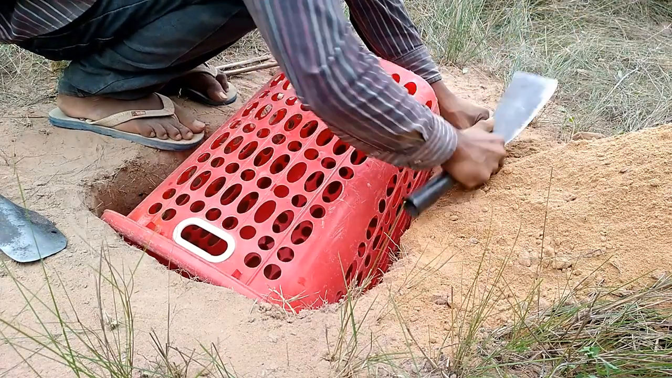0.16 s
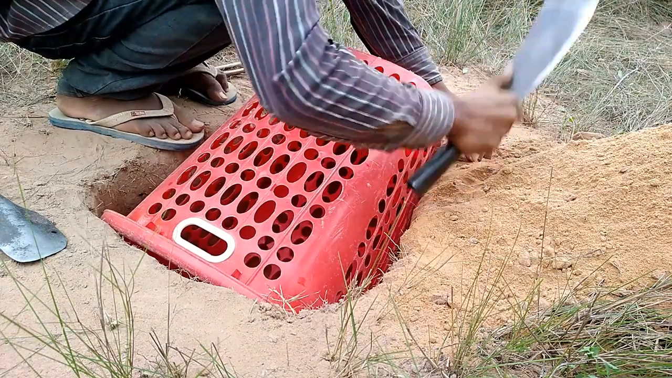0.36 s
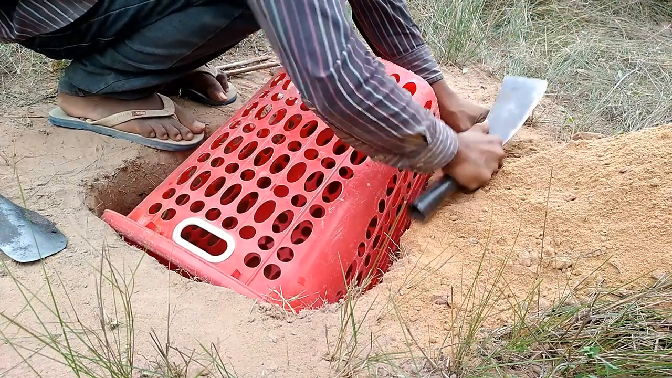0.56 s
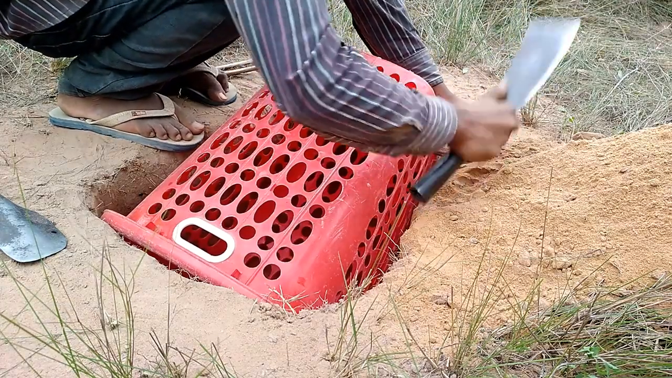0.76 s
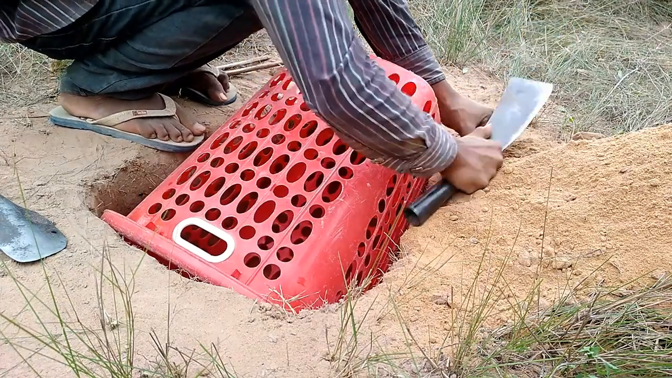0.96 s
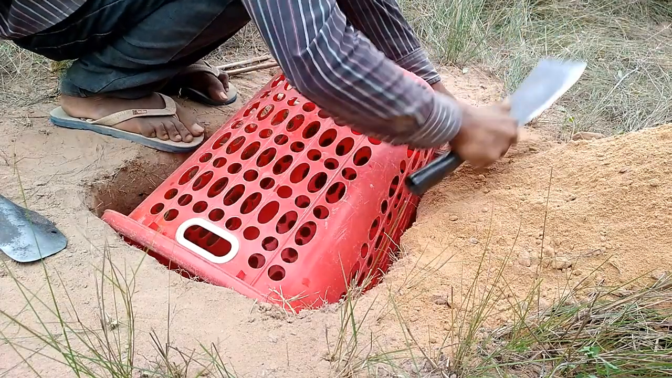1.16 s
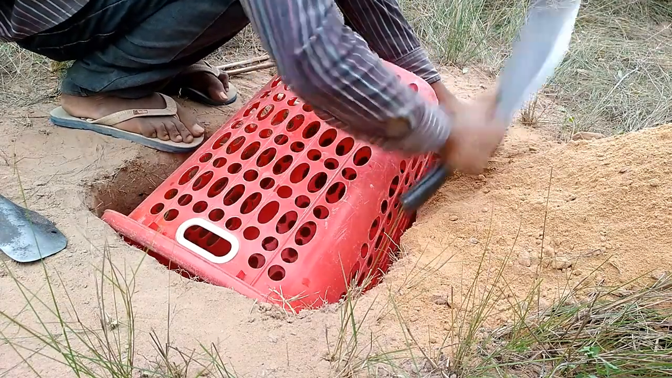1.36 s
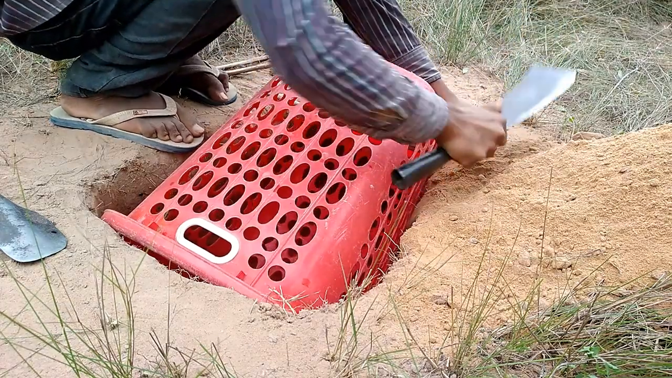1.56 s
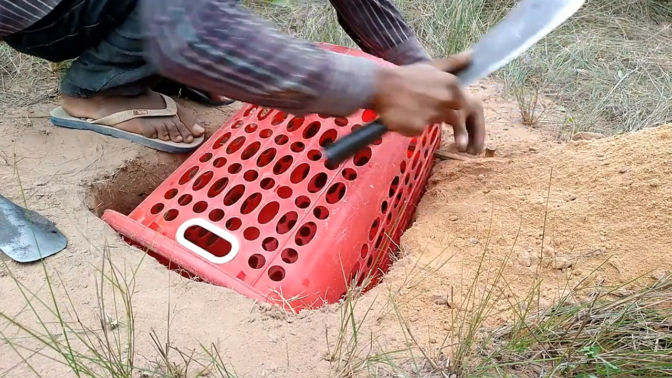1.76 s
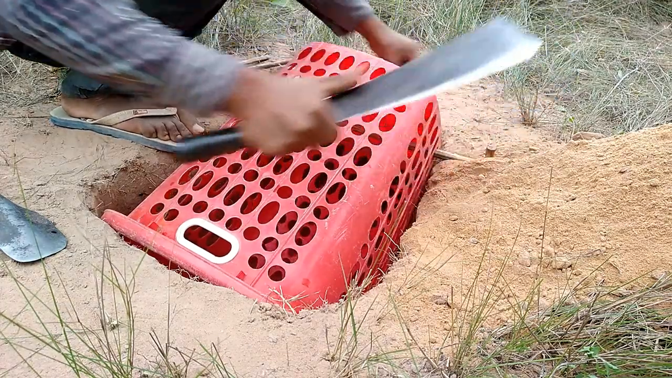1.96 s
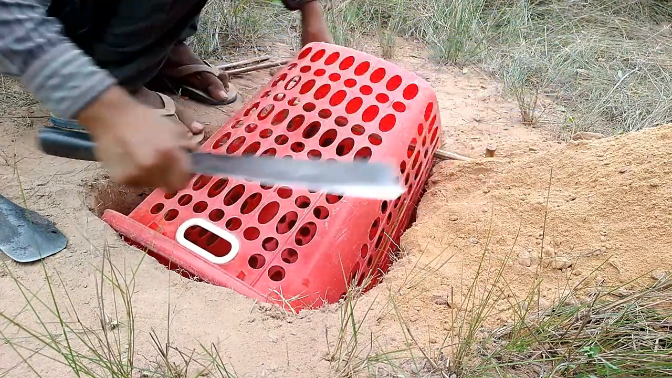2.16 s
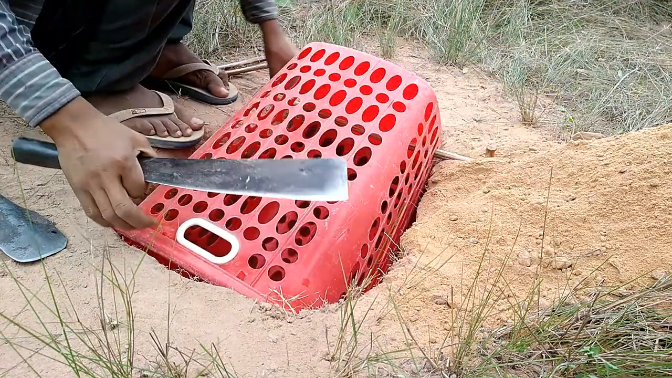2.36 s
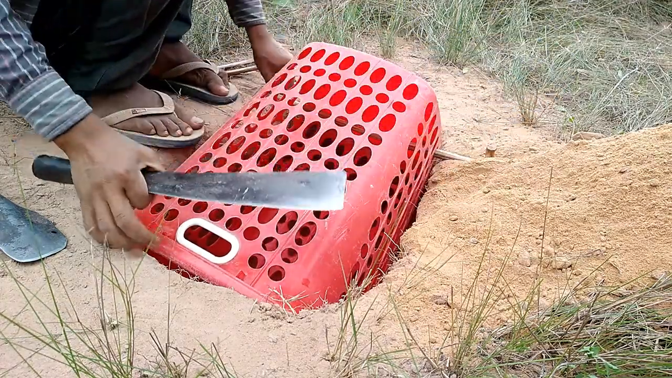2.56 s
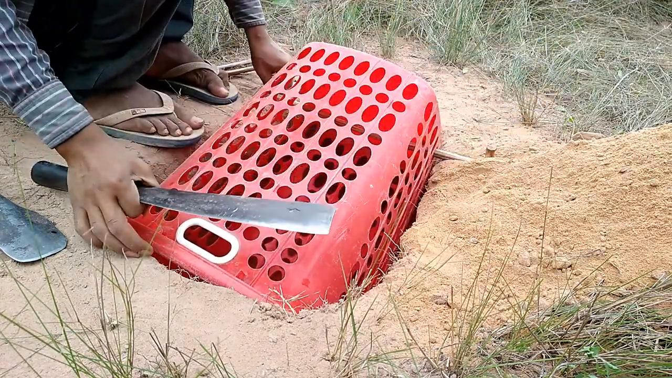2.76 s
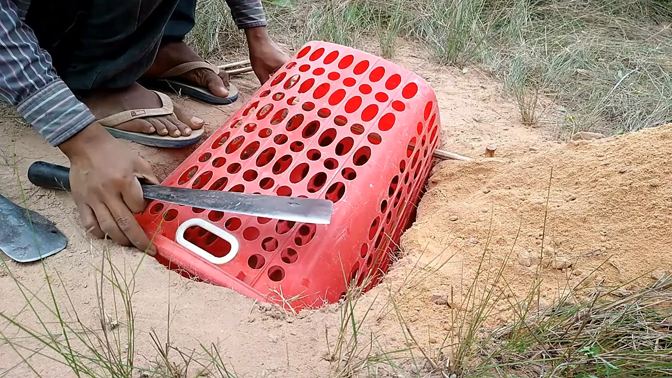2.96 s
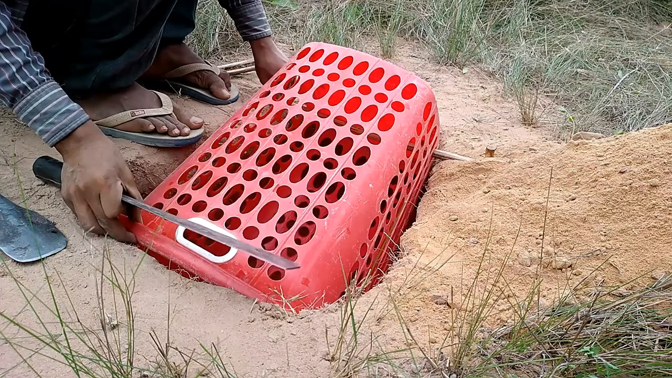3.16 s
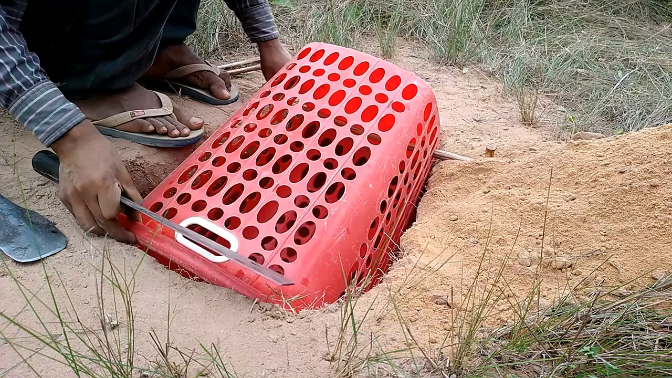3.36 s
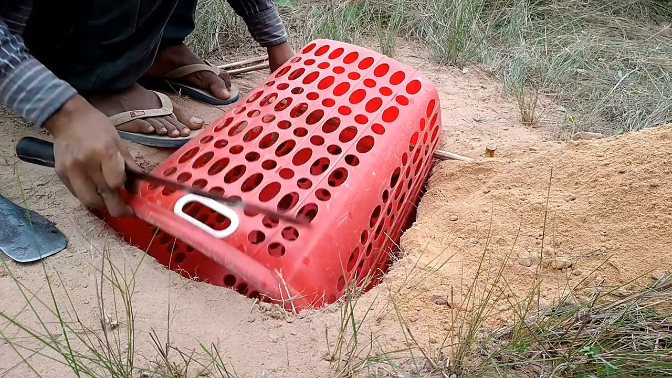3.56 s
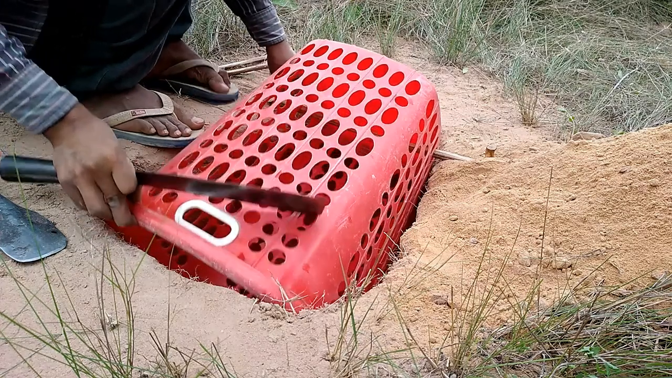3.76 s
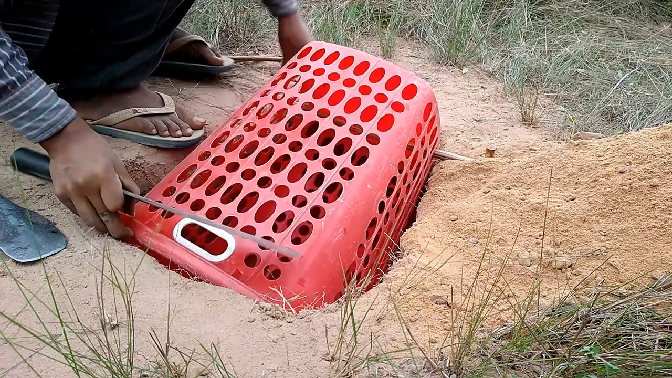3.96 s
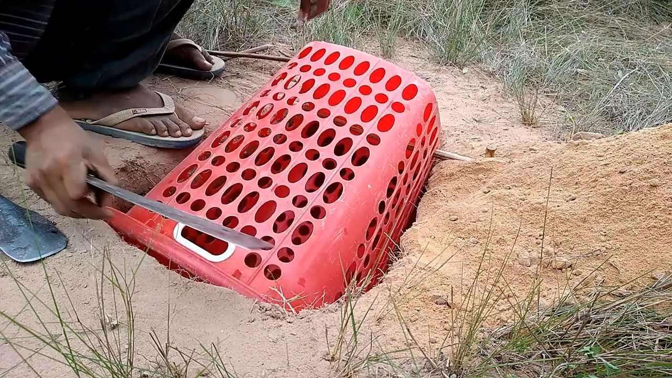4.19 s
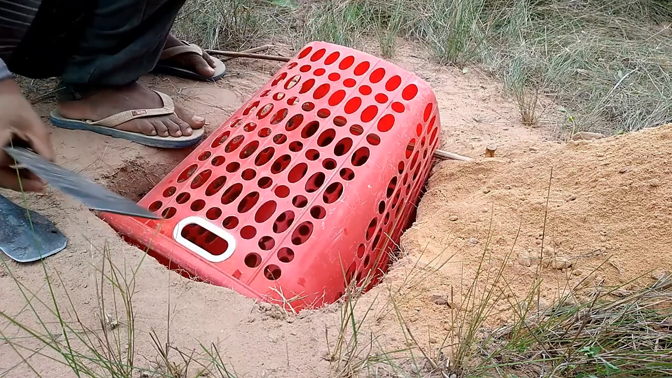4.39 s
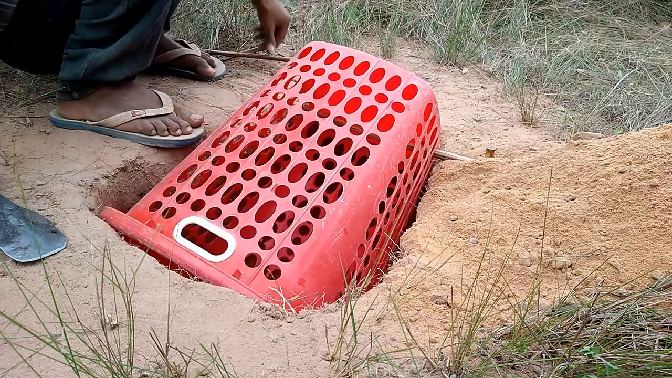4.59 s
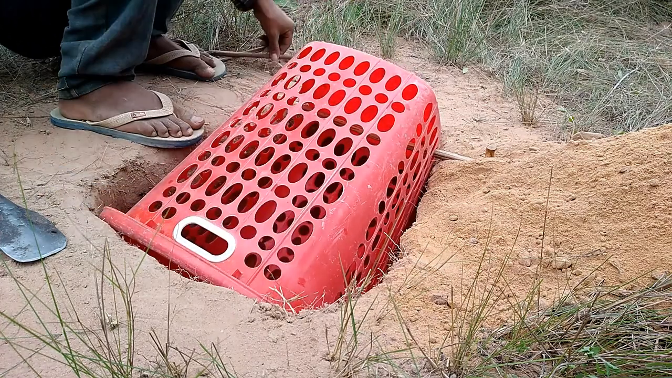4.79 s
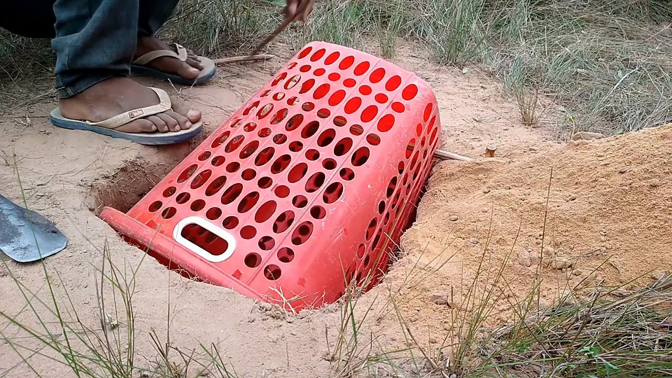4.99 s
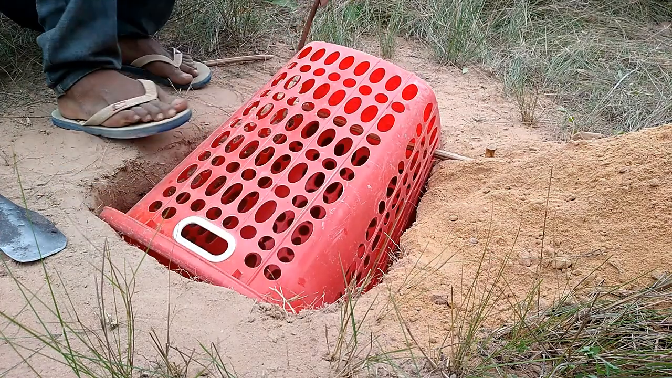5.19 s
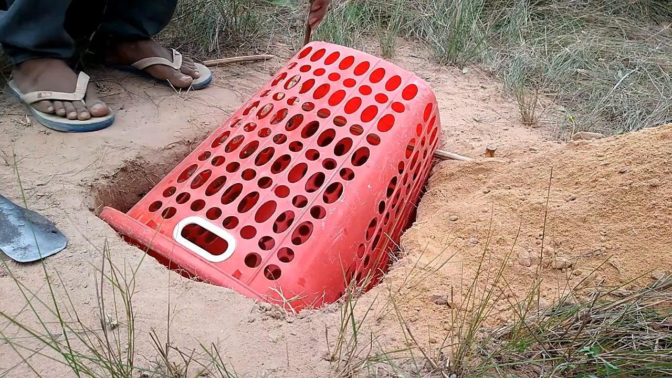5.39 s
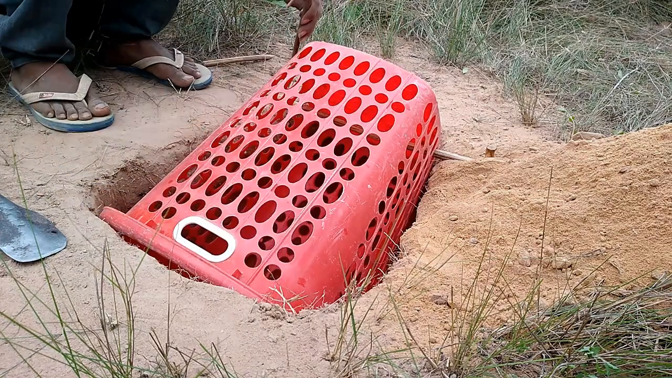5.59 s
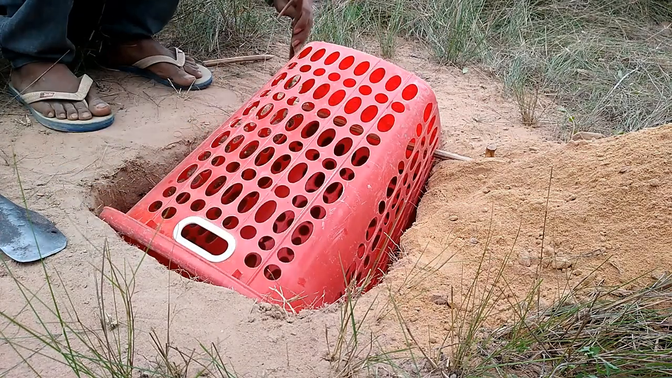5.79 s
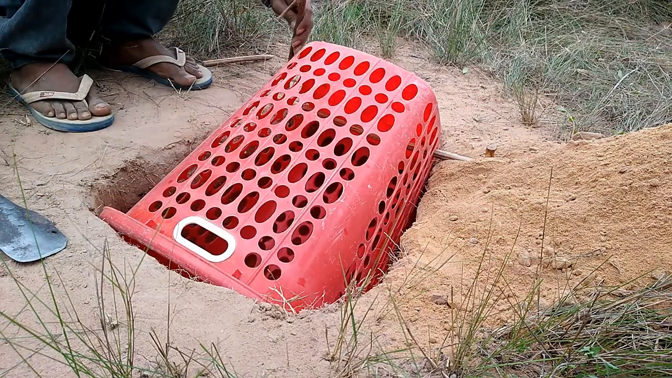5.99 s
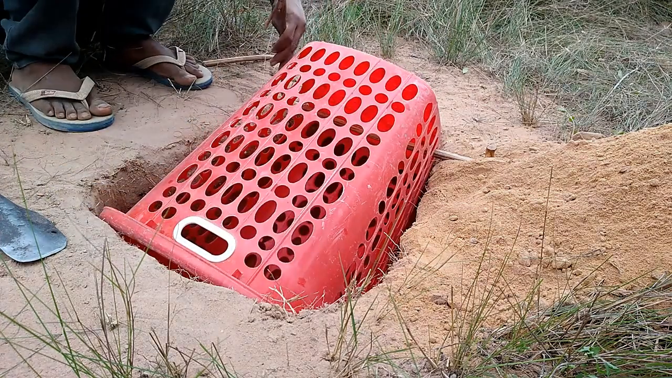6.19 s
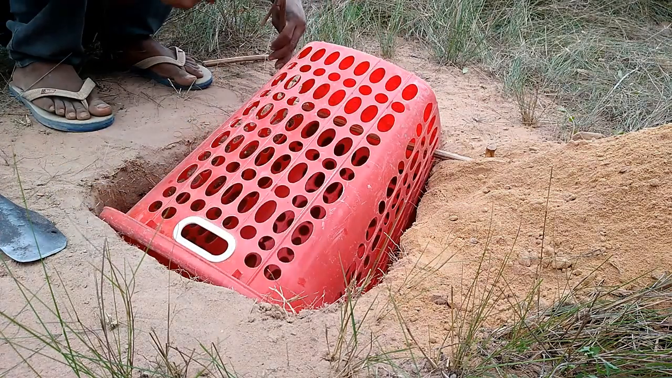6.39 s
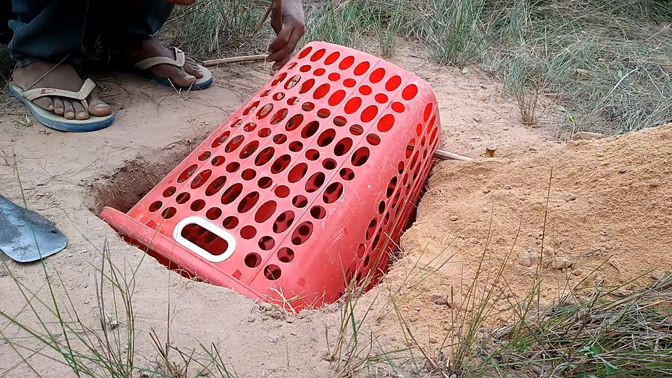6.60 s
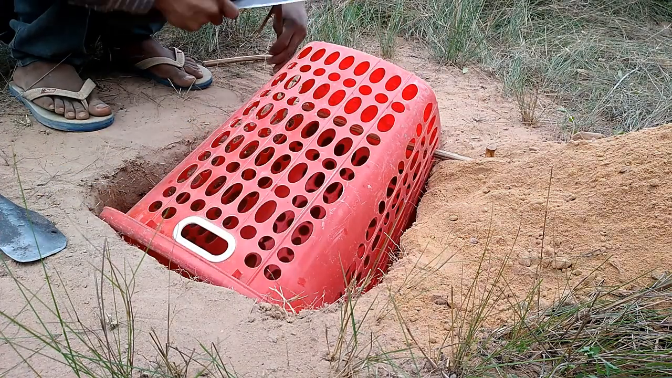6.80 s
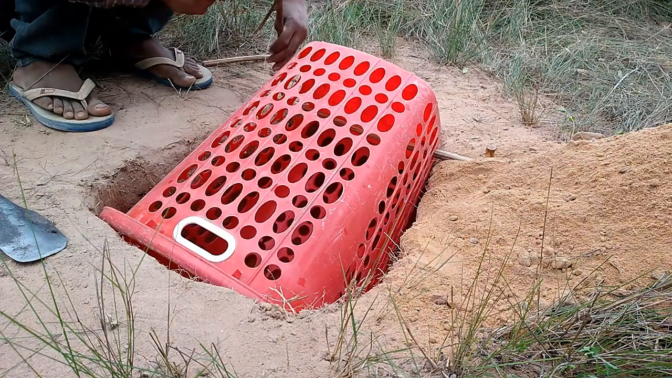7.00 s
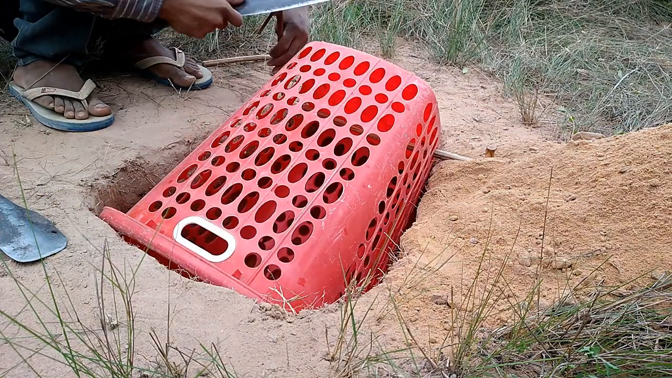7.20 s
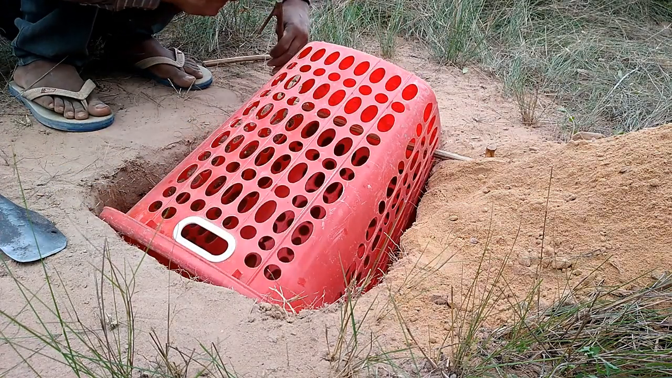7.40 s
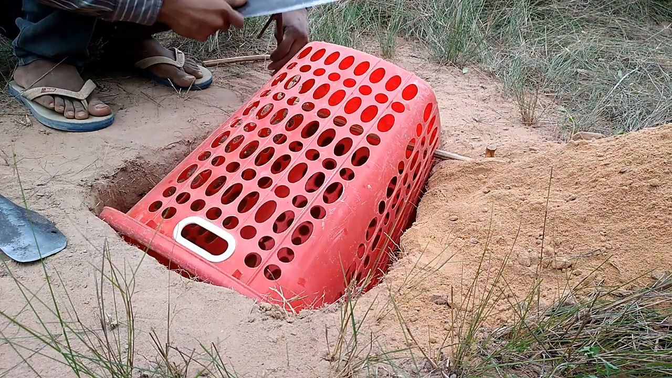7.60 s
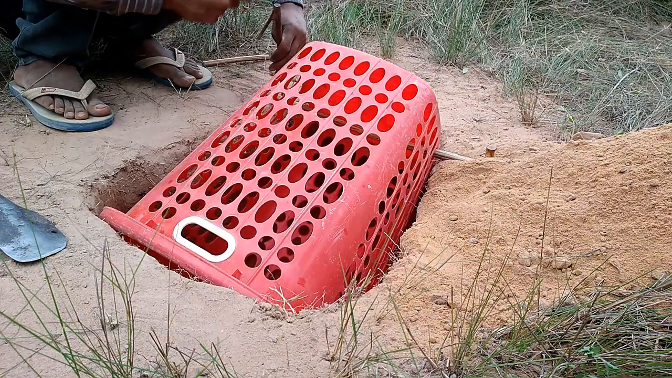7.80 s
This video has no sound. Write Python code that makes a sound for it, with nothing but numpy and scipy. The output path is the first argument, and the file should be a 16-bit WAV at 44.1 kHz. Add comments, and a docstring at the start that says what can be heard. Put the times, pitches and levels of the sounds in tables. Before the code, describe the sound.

Outdoors, close and dry, uneven low breeze rumble dies away over the first two seconds. A machete hits a wooden stake in sandy ground at about 0.2, 0.6 and 1.05 s: bright, sharp cracks with short woody knocks, light steel ring and brief diffuse scatter, each followed almost at once by a weaker rebound tap. A duller hit comes at 1.17 s, then a strong one with a fuller ground thud at 1.5 s. It becomes quiet, with soft taps around 2.4 and 2.9 s. From 3.5 to 4.1 s a plastic basket scrapes gritty sand in two short strokes and bumps hollowly; a low dull knock follows at 4.26 s. Sandals scuff near 5.3 s, with faint clicks and a barely audible blade sing around 5.9 s. At 6.5, 6.9, 7.2 and 7.6 s, a farther stake gets thinner, fainter metallic-woody knocks, the last strongest.

```python
"""In open air a breeze, as lumpy low noise, fades at the microphone while a machete knocks a stake into sand close by.
Each blow adds a noise crack, damped modes of wood, soil and blade, and noise scattered back from the surroundings.
Then come soft knocks, grainy noise of sandals shuffling and a plastic basket dragged, its bumps and a faint sing of the blade.
Faint clicks fall in between; last, a stake behind the upturned basket is struck, its thud fainter against the blade.
At the microphone the two ports differ in colour, a gate turns quiet treble down and the top is cut."""
import sys
import numpy as np
from scipy import signal
from scipy.fft import rfft, irfft, next_fast_len
from scipy.io import wavfile
from scipy.ndimage import uniform_filter1d

SR = 44100
rng = np.random.default_rng(int(sys.argv[2]) if len(sys.argv) > 2 else 0)


def waveform_to_disk(signal):
    """Save audio, clipped to [-1, 1], as 16-bit WAV at the path in sys.argv[1]."""
    frames = np.transpose(np.atleast_2d(signal))
    scaled = np.clip(frames, -1, 1) * 32767
    samples = np.round(scaled).astype(np.int16)
    wavfile.write(sys.argv[1], SR, samples)


N = 346185
TIME = np.arange(N) / SR   # the whole scene [s]
AGE = np.arange(2 ** 14) / SR   # time since a hit or the start of a stroke [s]

# low rumble of moving air, also lent to the dragged shell: (frequency [Hz], relative level [dB])
RUMBLE_COLOUR = [(15, 0.5), (35, 6.5), (80, -4), (130, -17), (250, -31), (600, -48.5), (2000, -73)]
# crack of a contact, also lent to the faint clicks: (frequency [Hz], relative level [dB])
CRACK_COLOUR = [(200, -7), (600, 0), (1200, -0.5), (1900, -3.5), (3000, -3.5), (4500, -8.5), (6500, -11),
                (8500, -18), (10500, -30), (16000, -42.5)]
# machete blade modes: (frequency [Hz], level struck at spot 0 [dB], at spot 1 [dB], at spot 2 [dB], t60 [s])
BLADE_MODES = [(1131, 2, 9, -20, .17), (1533, -11, -17, 4, .27), (1832, -1, 11, -8, .09),
               (2541, -7, -6, 1, .17), (2773, -9, -9, -11, .27), (3865, -17, -16, -10, .36),
               (3950, -22, -14, -6, .3), (4621, -14, 1, -2, .32), (4630, -19, 0, -8, .25),
               (4957, -15, -13, -16, .13), (6256, 0, -1, 2, .2), (6854, -20, -7, -8, .2),
               (7288, -3, -32, -26, .55), (8815, -4, -6, -4, .13), (9940, -16, -36, -24, .11),
               (10890, -13, -38, -16, .1), (12960, -27, -40, -28, .12)]
# plastic rim against sand: (frequency [Hz], relative level [dB])
DRAG_COLOUR = [(150, 5.5), (400, -3), (800, -0.5), (1400, 1.5), (2500, -2.5), (4500, -5.5), (7000, -13),
               (9200, -12.5), (11000, -30), (16000, -37)]


def from_db(db):
    """Decibels to gain."""
    return 10 ** (np.asarray(db) / 20)


def level(curve):
    """Gain over time from (time [s], level [dB]) rows, -200 dB outside them."""
    return from_db(np.interp(TIME, *np.transpose(curve), left=-200, right=-200))


def fade(t60):
    """Exponential decay from the moment of a hit, closing softly at the end."""
    closing = np.minimum(1, 10 * (1 - AGE / AGE[-1]))
    return np.exp(-np.log(1000) * AGE / t60) * closing


def add(track, s, sound):
    """Mix a short sound into a track at time s."""
    start = round(s * SR)
    track[..., start:start + sound.shape[-1]] += sound[..., :N - start]


def filtered(x, hz, db):
    """Apply a smooth frequency response, interpolated over log frequency."""
    size = next_fast_len(x.shape[-1], real=True)
    bins_hz = np.fft.rfftfreq(size, 1 / SR)
    gain = from_db(np.interp(np.log(bins_hz + 1), np.log(hz), db))
    return irfft(rfft(x, size) * gain, size)[..., :x.shape[-1]]


def coloured(x, spectrum):
    """Give a signal a spectrum; rms 1."""
    out = filtered(x, *np.transpose(spectrum))
    return out / np.sqrt(np.mean(out ** 2))


def noise(spectrum, width, size):
    """Stereo noise; width is the size of the side part against the middle."""
    mid, side = rng.standard_normal((2, size))
    return coloured(np.array([mid + width * side, mid - width * side]), spectrum)


def burst(spectrum, width, t60):
    """A puff of stereo noise that rises within a fraction of a millisecond and dies away."""
    rise_s = 0.00024
    rise = 1 - np.exp(-(AGE / rise_s) ** 2)
    return noise(spectrum, width, size=len(AGE)) * fade(t60) * rise


def ring(hz, db, t60, spread_db, contact_s):
    """Damped sines of alternating sign, so that close pairs swell and beat; they build up during the contact."""
    signs = (-1) ** np.arange(len(hz))
    gains = from_db(db + spread_db * rng.standard_normal(len(hz))) * signs
    modes = sum(g * np.sin(np.float32(2 * np.pi * f * AGE)) * fade(t) for g, f, t in zip(gains, hz, t60))
    return modes * (1 - np.exp(-AGE / contact_s))


def from_side(x, lead_ms):
    """Sound reaches the left port earlier by lead_ms (later if negative)."""
    left, right = np.broadcast_to(x, (2, x.shape[-1]))
    shift = round(lead_ms * SR / 1000)
    left = np.pad(left, (max(-shift, 0), 0))[:len(left)]
    right = np.pad(right, (max(shift, 0), 0))[:len(right)]
    return np.array([left, right])


def open_air():
    """Steady background of the open place, as wide noise weighted to the lows."""
    # open-air background: (frequency [Hz], relative level [dB])
    colour = [(15, 4), (35, 1), (75, -2), (130, -10), (250, -20), (500, -29), (900, -34), (1600, -39),
              (3200, -36), (6000, -43), (7900, -38), (9500, -46.5), (15500, -56)]
    return from_db(-53) * noise(colour, 0.68, size=N)


def breeze():
    """Air moving over the microphone ports rumbles in uneven lumps."""
    # the breeze dying down to a faint rest: (time [s], level [dB])
    wind = [(0, -37), (0.5, -44.5), (1.0, -42), (2.0, -62), (7.85, -62.5)]
    lump_db, lump_s = 3, .07   # unevenness, and spacing of its random points
    knots = np.arange(0, TIME[-1] + lump_s, lump_s)
    lumps = np.interp(TIME, knots, rng.standard_normal(2 ** 10)[:len(knots)])
    return level(wind) * from_db(lump_db * lumps) * noise(RUMBLE_COLOUR, 0.8, size=N)


def wood_knock(range_db):
    """The stake rings in short modes, each weighted by the level of its frequency range."""
    # stake modes: (frequency [Hz], level [dB], t60 [s])
    modes = [(954, -17, 0.042), (1029, 1, 0.049), (1250, -14, 0.031), (1850, -8.5, 0.025),
             (2735, -3, 0.026), (2830, -7, 0.059), (3300, -7, 0.0097), (3776, -10.5, .035),
             (3925, -8, 0.068), (5068, 1, 0.027), (6460, -17, 0.022), (9300, -29.5, 0.057),
             (9000, -35, 0.04)]
    # middles of the stake's four ranges: (frequency [Hz])
    ranges_hz = [1050, 2700, 3900, 5200]
    hz, db, t60 = np.transpose(modes)
    weight_db = np.interp(np.log(hz), np.log(ranges_hz), range_db)
    return ring(hz, db + weight_db, t60, spread_db=2.63, contact_s=0.00033)


def soil_thud(thud_db, tilt):
    """The stake shoves the soil, whose low modes are tilted by so many dB per octave."""
    # soil around a stake: (frequency [Hz], level [dB], t60 [s])
    modes = [(80.4, -12.5, 0.11), (129, -3, 0.095), (184.43, -5, 0.04), (255, -3, 0.041), (350, -7, .058),
             (430, -15.5, 0.06), (515, -19, 0.065)]
    hz, db, t60 = np.transpose(modes)
    return ring(hz, db + thud_db + tilt * np.log2(hz / hz[1]), t60, spread_db=3.5, contact_s=0.00063)


def blade_ring(blade_db, spot, slant_db):
    """The steel's modes are weighted by where along the blade, and at what slant, the stake is met."""
    tilt_per_slant, pivot_hz = .25, 3983   # dB per octave for each dB of slant
    pressed_db, pressed_t60_s = 3.5, .05   # extra ring, lost quickly while the steel lies on the wood
    hz, *spots_db, t60 = np.transpose(BLADE_MODES)
    db = np.array([np.interp(spot, np.arange(len(mode)), mode) for mode in np.transpose(spots_db)])
    db = db + tilt_per_slant * slant_db * np.log2(hz / pivot_hz)
    steel = ring(hz, db + blade_db, t60, spread_db=1.77, contact_s=0.00063)
    return steel * (1 + from_db(pressed_db) * fade(pressed_t60_s))


def blow(stake, db, softness, slant_db, firmness, spot, damping_db):
    """One blow: crack of crushed fibres, knock, thud, blade ring, then scatter from the surroundings."""
    # the near and far stakes by name: (thud [dB], [wood in each of four ranges [dB]], blade [dB],
    # scatter [dB], scatter t60 [s], lead of the left port [ms])
    stakes = {"near": (-.5, [2.5, 2, 0, 3.5], -21.5, -28, 0.31, .08), "far": (-12, [-18, 6, 16, -15],
              -16, -17, 0.19, -0.11)}
    # scatter from grass and ground: (frequency [Hz], relative level [dB])
    scatter_colour = [(200, -3), (600, -3.5), (1200, -6.5), (2000, -2.5), (2900, -2.5), (4000, 0.5),
                      (5500, -7.5), (8700, -14), (10000, -34), (16000, -41.5)]
    soft_crack_loss_db, soft_wood_loss_db = 5.5, np.array([12, 29, 29, 12])   # taken by a fully soft contact
    firm_thud_db, firm_scatter_db = 14, 5   # a firm stake passes more of the blow to the ground
    loose_tilt, firm_tilt, soft_tilt = 4.5, -1.5, -3.5   # thud slope [dB per octave]; softness adds its own
    thud_db, wood_db, blade_db, scatter_db, scatter_t60, lead_ms = stakes[stake]

    crack_db = db - softness * soft_crack_loss_db
    crack = from_db(crack_db) * burst(CRACK_COLOUR, 0.36, t60=0.035)
    # a slanted blow shifts the balance between the stake's two middle ranges
    slant_shift_db = slant_db * np.array([0, -1, 1, 0])
    knock = wood_knock(db + np.array(wood_db) - softness * soft_wood_loss_db + slant_shift_db)

    tilt = loose_tilt + firmness * (firm_tilt - loose_tilt) + softness * soft_tilt
    thud = soil_thud(db + thud_db + firmness * firm_thud_db, tilt)
    thud = np.interp(AGE - 0.0012, AGE, thud)   # the soil gives way a moment later
    blade = blade_ring(db + blade_db - damping_db, spot, slant_db)

    # the basket and ground reflect at once, grass and bushes linger
    early = from_db(crack_db - 14.5) * burst(CRACK_COLOUR, .8, t60=0.1)
    scatter_gain = from_db(db + scatter_db + firmness * firm_scatter_db)
    scatter = scatter_gain * burst(scatter_colour, 0.94, scatter_t60)
    return from_side(crack + knock + thud, lead_ms) + from_side(blade, .6 * lead_ms) + early + scatter


def hammering():
    """Blows on either stake; the near one, still loose, springs back against the blade after some of them."""
    # machete blows: (time [s], stake, strength [dB], softness of contact [0-1], slant [dB],
    # firmness of the stake [0-1], spot on the blade [0-2])
    blows = [(0.1984, "near", -19.5, .02, 0.5, 0.26, 0.29), (0.6143, "near", -19.5, 0.04, -3.5, 0.3, 0.13),
             (1.0452, "near", -19, .05, -1.5, 0.33, 0.29), (1.168, "near", -21.5, 1, -2.5, 0.49, 0.64),
             (1.4876, "near", -17, 0.24, -4.5, 1, 1.0), (6.5144, "far", -45.5, 0.28, -7, 0.01, 1.67),
             (6.8609, "far", -38.5, 0.2, 9.5, 0, 1.41), (7.1969, "far", -37, 0.22, 1, 0.37, 1.9),
             (7.5595, "far", -30, 0.11, 4, .22, 1.76)]
    # spring-back contacts of the near stake: (time [s], strength [dB])
    rebounds = [(0.2306, -32), (0.6404, -23.5), (1.0707, -29)]
    out = np.zeros((2, N))
    for s, *stroke in blows:
        add(out, s, blow(*stroke, damping_db=0))
    for s, db in rebounds:   # a light touch that hardly rings the blade
        add(out, s, blow("near", db, softness=.55, slant_db=0, firmness=0, spot=0, damping_db=22))
    return out


def taps():
    """Dull, soft knocks of hands and feet, each a single damped mode."""
    # soft knocks: (time [s], level [dB], frequency [Hz], t60 [s])
    knocks = [(2.373, -50.5, 678, 0.034), (2.875, -60, 511, 0.07), (3.06, -63, 1067, 0.064),
              (4.26, -44.5, 157.3, 0.23), (4.268, -50.5, 284.4, 0.16), (4.54, -60, 956, 0.045)]
    out = np.zeros((2, N))
    for s, db, hz, t60 in knocks:
        add(out, s, ring([hz], db, [t60], spread_db=0, contact_s=0.0026))
    return out


def strokes(rows, rise_share):
    """Gain of sliding strokes: each gathers speed over a share of its length, sags, then stops short."""
    swell_power = 2.18   # how slowly a stroke gets going
    sag_db_per_s, release_t60_s = 11.5, 0.065
    gain = np.zeros(N)
    for s, length, db in rows:
        rise_s = rise_share * length
        swell = np.sin(np.pi / 2 * np.minimum(AGE / rise_s, 1)) ** swell_power
        sag = from_db(-sag_db_per_s * np.maximum(AGE - rise_s, 0))
        release = np.exp(-np.log(1000) * np.maximum(AGE - length, 0) / release_t60_s)
        add(gain, s, from_db(db) * swell * sag * release)
    return gain


def sand(gain, colour, grains_per_s, size_db, lump_db, width):
    """Sand grains slip at random under a sliding weight, which catches and lets go every few milliseconds."""
    size = 2 ** 16   # grain pattern, repeated under the gain
    slips = rng.random((2, size)) < grains_per_s / SR
    catching = uniform_filter1d(rng.standard_normal(size), size=400)
    random_size = np.minimum(rng.exponential(1, (2, size)), 4)
    grain_db = size_db * random_size + lump_db * catching / catching.std()
    mid, side = slips * rng.standard_normal((2, size)) * from_db(grain_db)
    stereo = np.array([mid + width * side, mid - width * side])
    grains = from_side(coloured(stereo, colour), -0.12)
    return gain * grains[:, np.arange(N) % size]


def shuffling():
    """Sandals and hands shuffle on sand, in dense slipping grains."""
    # shuffles: (time [s], length [s], level [dB])
    rows = [(2.94, 0.039, -61.5), (4.93, 0.086, -64.5), (4.98, 0.34, -68.5), (5.31, .165, -52)]
    # soles and hands on sand: (frequency [Hz], relative level [dB])
    colour = [(300, -5), (1000, -7.5), (2000, -11.5), (3200, 0), (4200, -1.5), (5500, -11.5), (8500, -13.5),
              (11000, -31), (16000, -46)]
    sliding = strokes(rows, rise_share=0.84)
    return sand(sliding, colour, grains_per_s=11000, size_db=3.9, lump_db=-3.5, width=0.74)


def basket_drag():
    """The basket rim scrapes through sand grains, and its shell shakes with a low rumble as it slides."""
    # drags: (time [s], length [s], level [dB])
    rows = [(3.03, .09, -73), (3.42, .12, -67), (3.48, 0.2463, -47), (3.77, 0.2493, -52.5)]
    sliding = strokes(rows, rise_share=0.46)
    scrape = sand(sliding, DRAG_COLOUR, grains_per_s=4500, size_db=1.0, lump_db=0.6, width=0.59)
    rumble = from_db(-6) * sliding * noise(RUMBLE_COLOUR, 0.21, size=N)
    return scrape + rumble


def faint_clicks():
    """Faint clicks, as noise that dies within milliseconds."""
    # faint clicks: (time [s], level [dB])
    clicks = [(3.231, -42.5), (5.881, -51), (6.104, -45)]
    out = np.zeros((2, N))
    for s, db in clicks:
        add(out, s, from_db(db) * noise(CRACK_COLOUR, 0.25, size=len(AGE)) * fade(0.0023))
    return out


def basket_bumps():
    """The plastic shell booms in its modes and clicks where it touches the ground."""
    # bumps on the ground: (time [s], body level [dB], click level [dB])
    bumps = [(3.516, -40.5, -76), (3.902, -47, -39), (3.964, -33.5, -45), (3.979, -34.5, -39.5),
             (4.106, -40.5, -56)]
    # basket modes: (frequency [Hz], level [dB], t60 [s])
    modes = [(56.7, -4.5, 0.19), (81.03, -3, 0.75), (109, -6, 0.16), (154.7, -6, 0.2), (255, -8, 0.055),
             (355, -8, 0.074), (426, -10.5, 0.092), (650, -7.5, 0.03), (1170, -22, 0.11)]
    out = np.zeros((2, N))
    hz, db, t60 = np.transpose(modes)
    for s, body_db, click_db in bumps:
        add(out, s, ring(hz, db + body_db, t60, spread_db=4.0, contact_s=0.00052))
        add(out, s, from_db(click_db) * noise(DRAG_COLOUR, 0.48, size=len(AGE)) * fade(0.042))
    return from_side(out, -.09)


def tings():
    """A light brush wakes only the blade's longest-lived mode."""
    # faint singing of the brushed blade: (time [s], level [dB])
    brushes = [(4.872, -67), (5.881, -67.5)]
    out = np.zeros((2, N))
    hz, *_, t60 = max(BLADE_MODES, key=lambda mode: mode[-1])
    for s, db in brushes:
        add(out, s, ring([hz], db, [t60], spread_db=2.0, contact_s=0.002))
    return out


def scene():
    """Work on the ground, in still open air once the breeze has faded."""
    surroundings = open_air() + breeze()
    basket = basket_drag() + basket_bumps()
    return surroundings + hammering() + taps() + shuffling() + basket + faint_clicks() + tings()


def noise_gate(x, threshold_db, depth_db, knee_db, split_hz, hold_s):
    """The treble is turned down shortly after its own level falls under the threshold."""
    bass = signal.sosfiltfilt(signal.butter(2, split_hz, fs=SR, output="sos"), x)
    treble = x - bass
    power = uniform_filter1d(np.mean(treble ** 2, axis=0), size=600)
    treble_db = 10 * np.log10(np.abs(power) + 1e-18)
    opening = np.clip((treble_db - threshold_db) / knee_db + .5, 0, 1)
    opening = np.maximum(opening, np.interp(TIME - hold_s, TIME, opening))
    closed = 1 - uniform_filter1d(opening, size=200)
    return bass + treble * from_db(depth_db * closed)


def record(dry):
    """Colour of the two microphone ports, noise gate, then the top is cut."""
    # the ports differ in colour: (frequency [Hz], left minus right [dB])
    ports = [(1200, 0), (2700, 0), (4200, -0.5), (6500, 3.5), (8700, -7), (12000, -0.5)]
    cutoff_hz = 15800
    hz, balance_db = np.transpose(ports)
    heard = np.array([filtered(dry[0], hz, balance_db / 2), filtered(dry[1], hz, -balance_db / 2)])
    gated = noise_gate(heard, threshold_db=-64.5, depth_db=-16.0, knee_db=4.0, split_hz=860, hold_s=0.0083)
    return signal.sosfilt(signal.ellip(10, .1, 80, cutoff_hz, fs=SR, output="sos"), gated)


dry = scene()
out = record(dry)
waveform_to_disk(out)
```